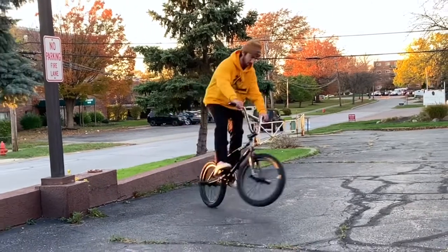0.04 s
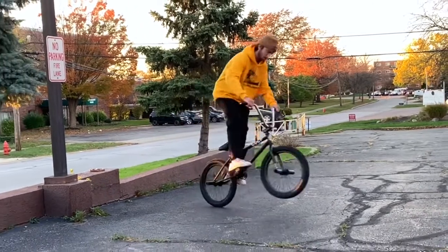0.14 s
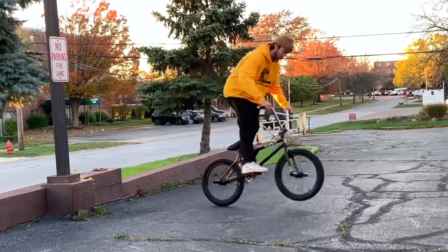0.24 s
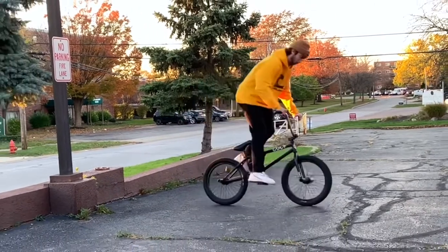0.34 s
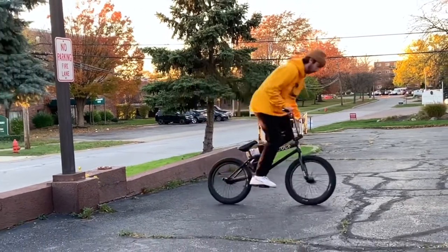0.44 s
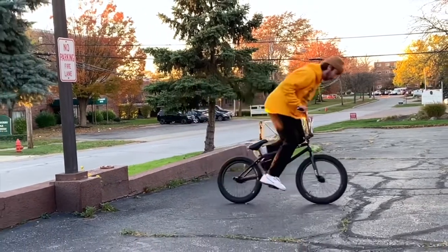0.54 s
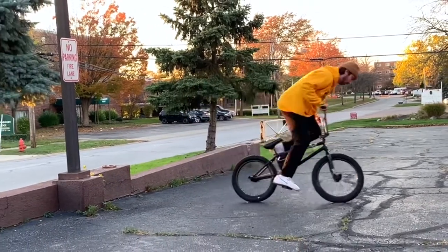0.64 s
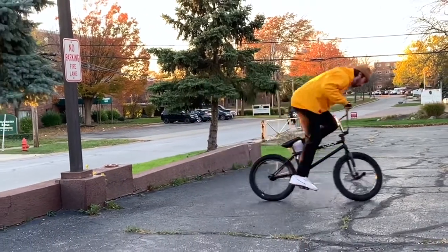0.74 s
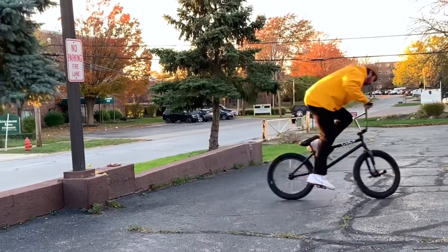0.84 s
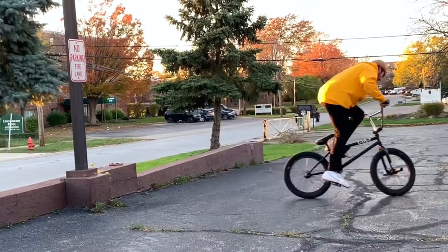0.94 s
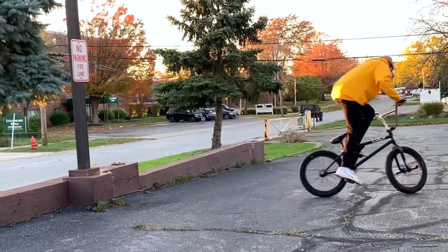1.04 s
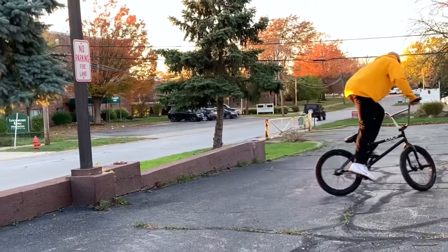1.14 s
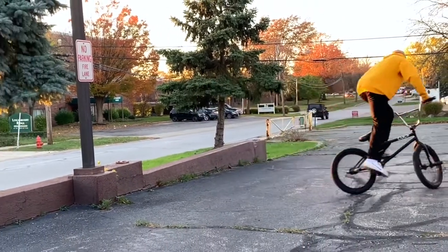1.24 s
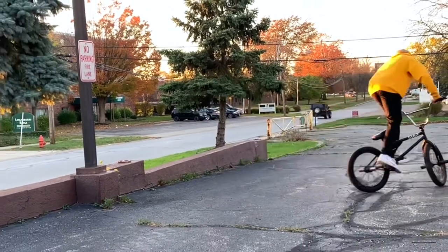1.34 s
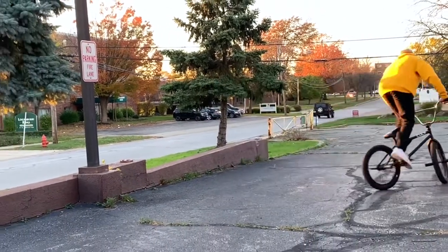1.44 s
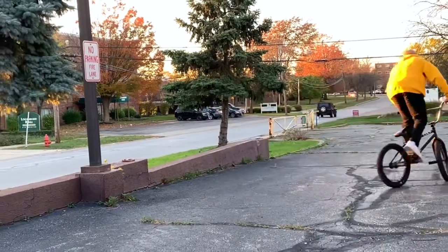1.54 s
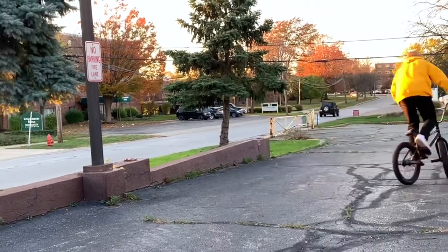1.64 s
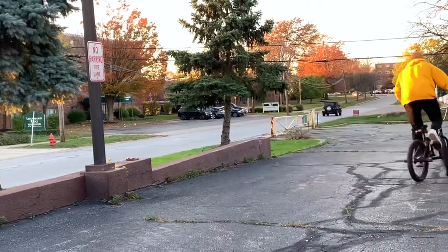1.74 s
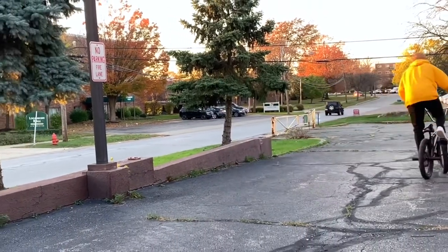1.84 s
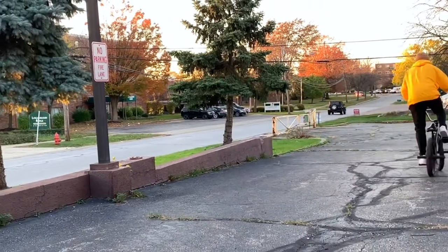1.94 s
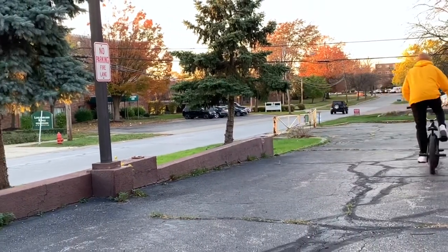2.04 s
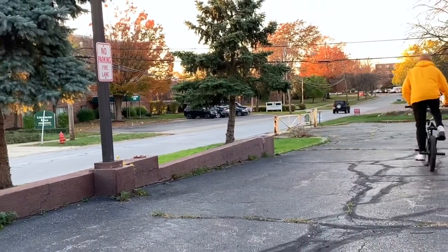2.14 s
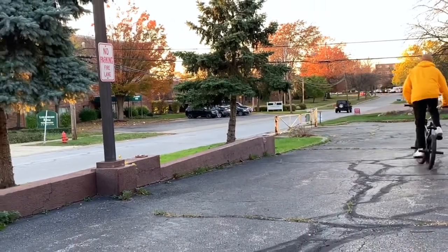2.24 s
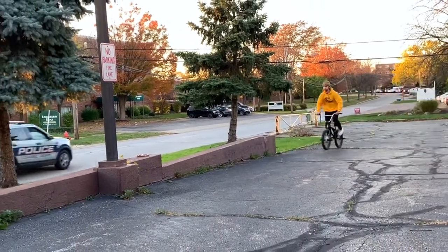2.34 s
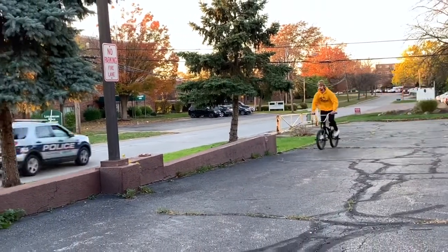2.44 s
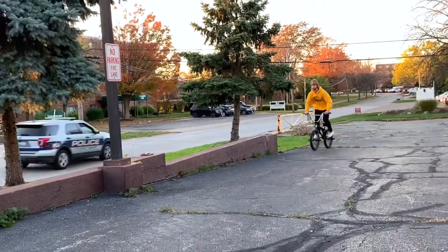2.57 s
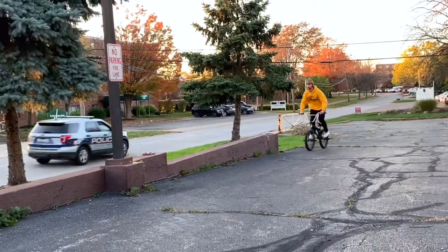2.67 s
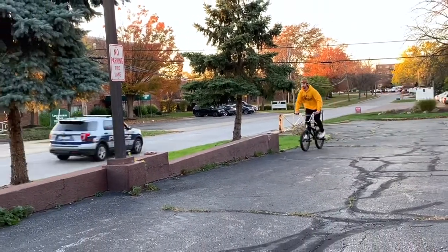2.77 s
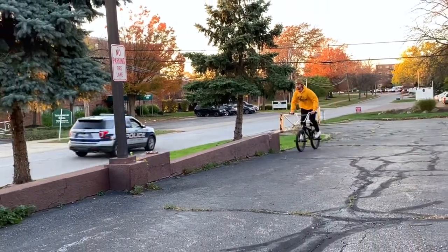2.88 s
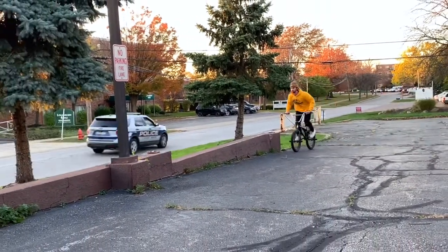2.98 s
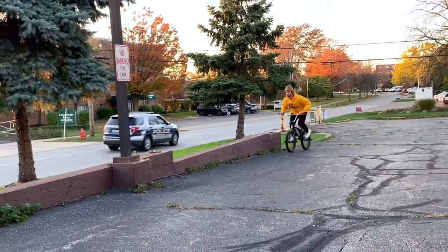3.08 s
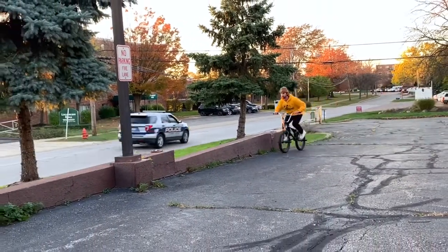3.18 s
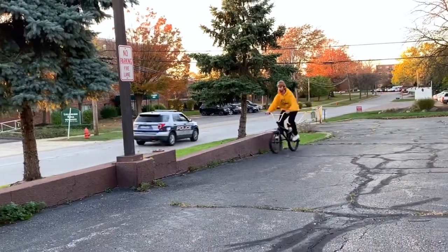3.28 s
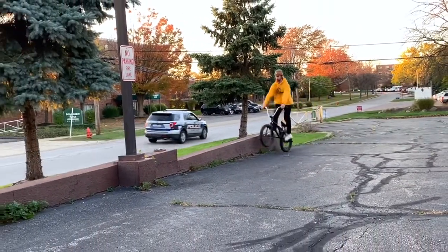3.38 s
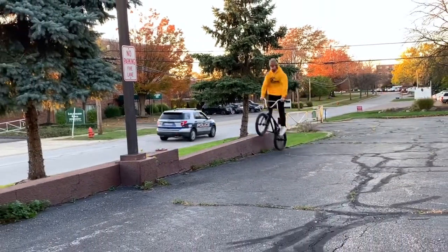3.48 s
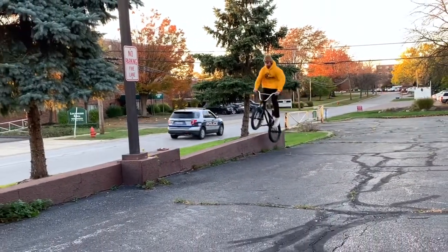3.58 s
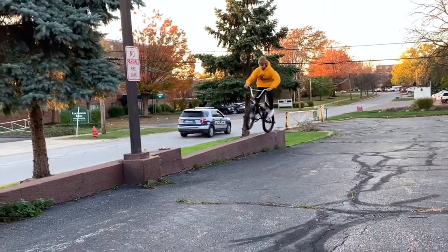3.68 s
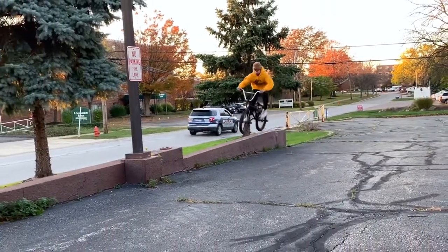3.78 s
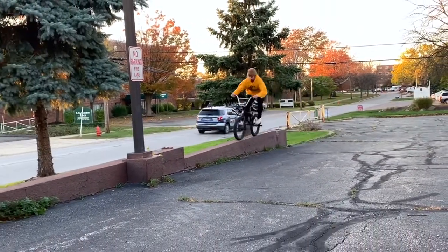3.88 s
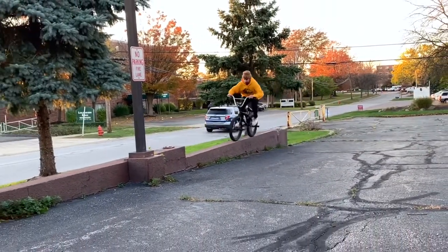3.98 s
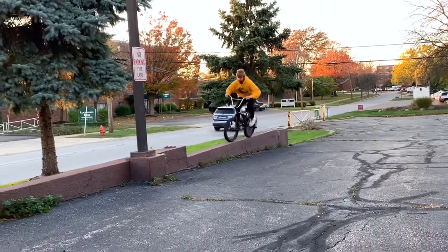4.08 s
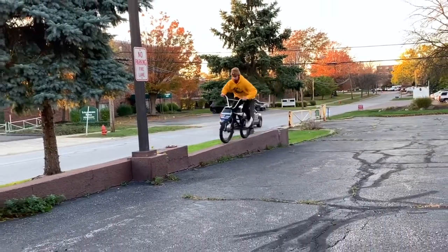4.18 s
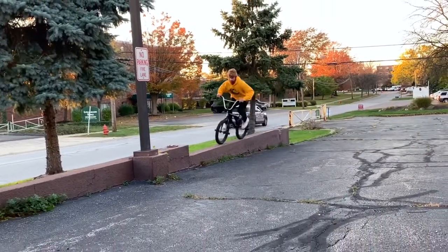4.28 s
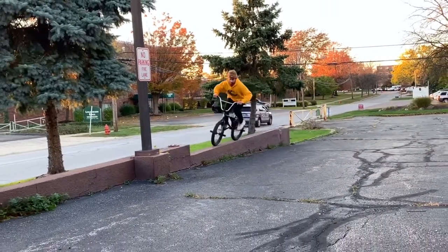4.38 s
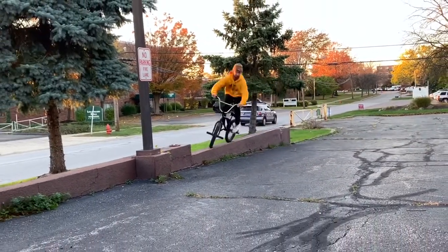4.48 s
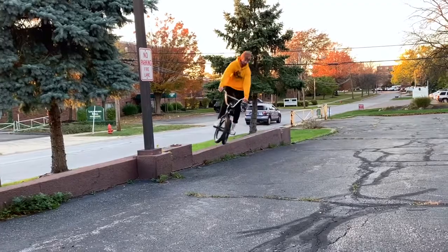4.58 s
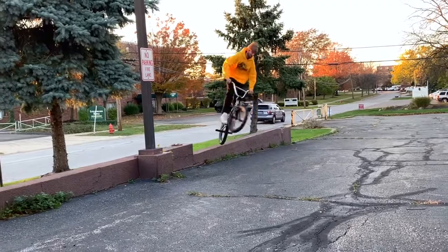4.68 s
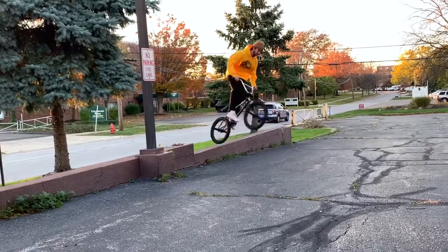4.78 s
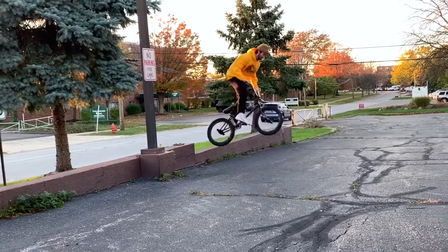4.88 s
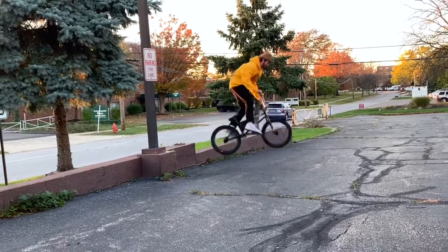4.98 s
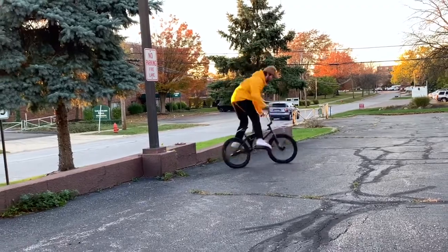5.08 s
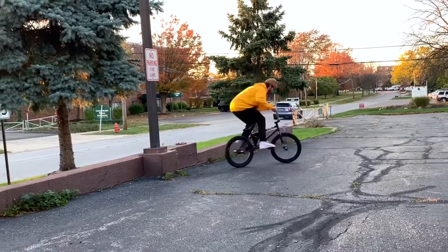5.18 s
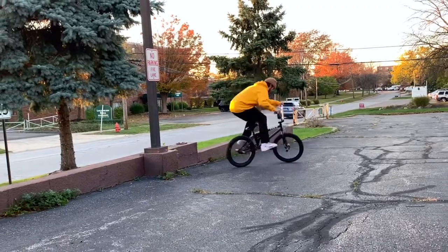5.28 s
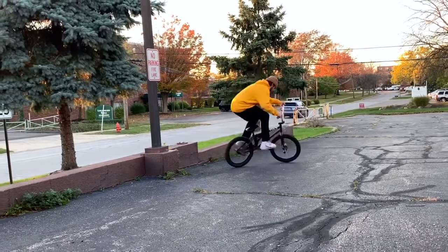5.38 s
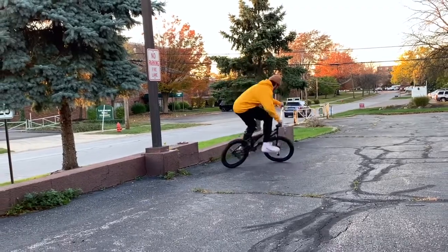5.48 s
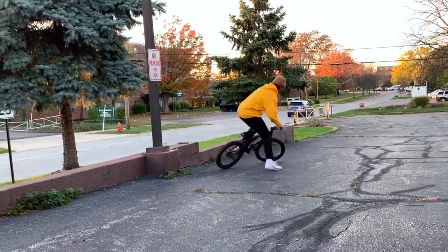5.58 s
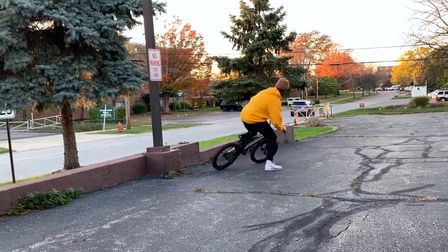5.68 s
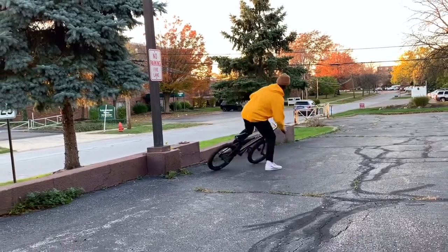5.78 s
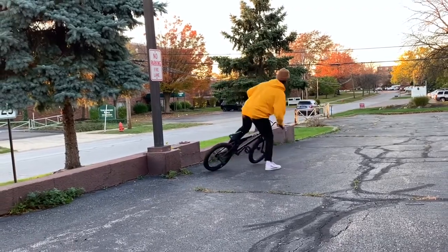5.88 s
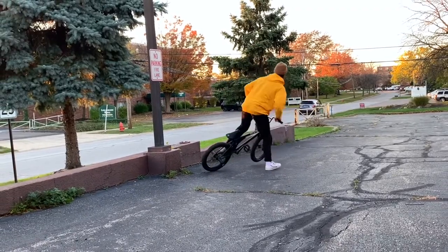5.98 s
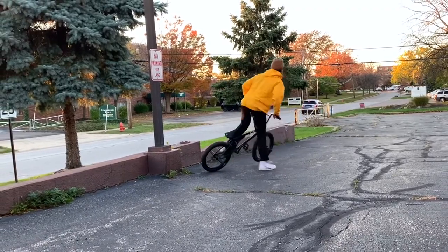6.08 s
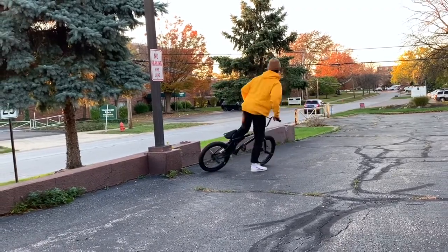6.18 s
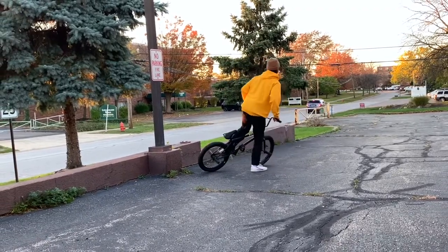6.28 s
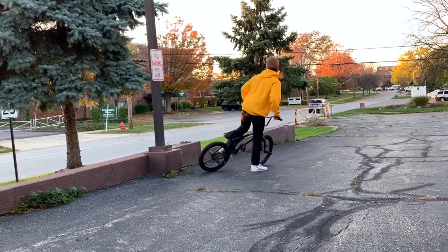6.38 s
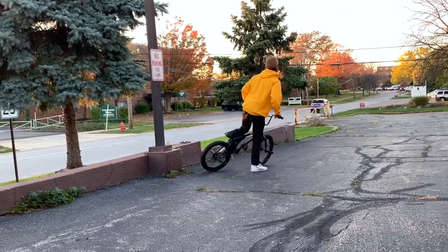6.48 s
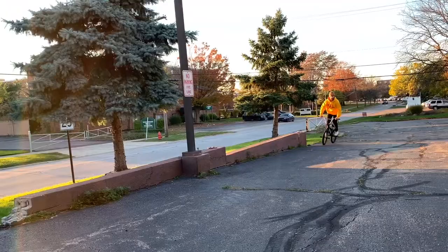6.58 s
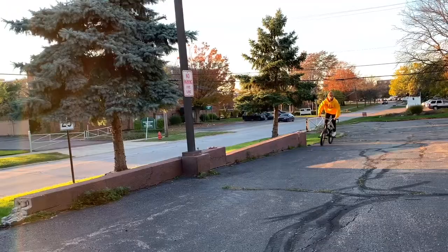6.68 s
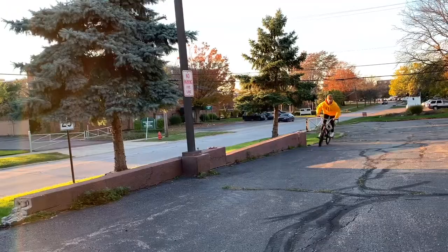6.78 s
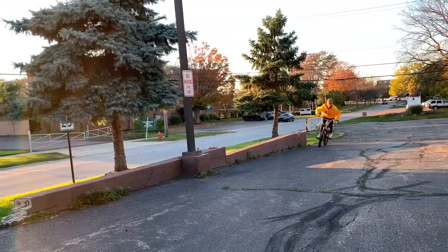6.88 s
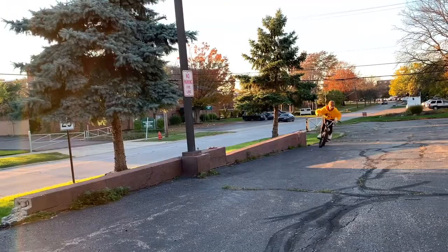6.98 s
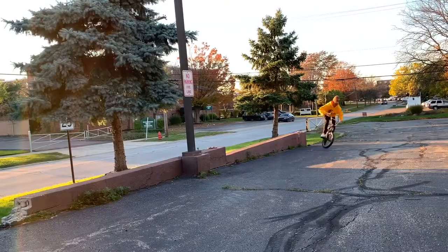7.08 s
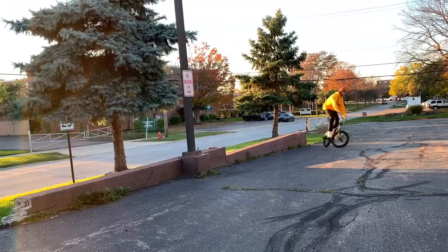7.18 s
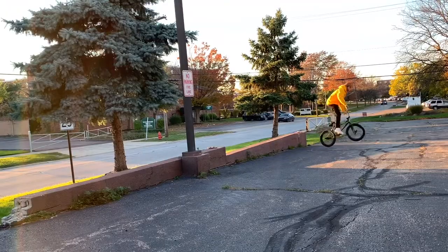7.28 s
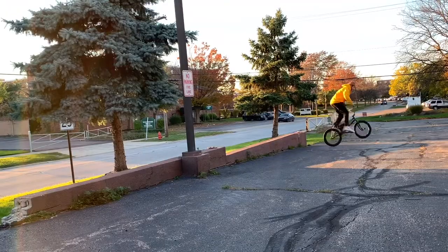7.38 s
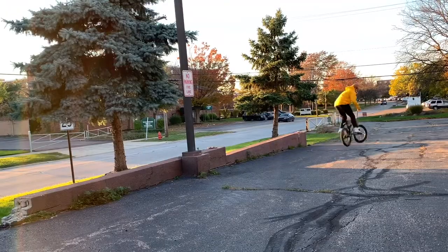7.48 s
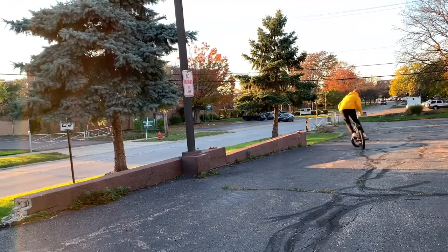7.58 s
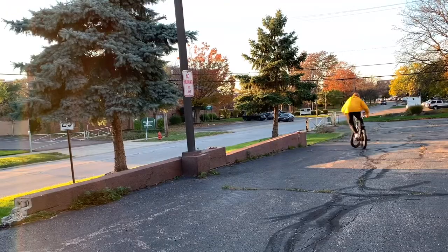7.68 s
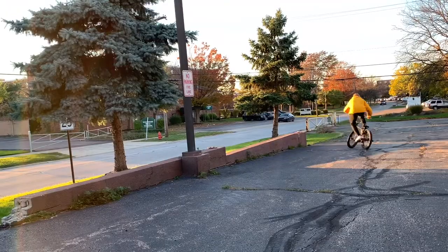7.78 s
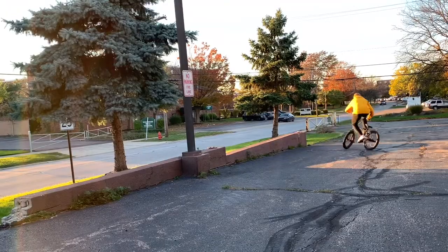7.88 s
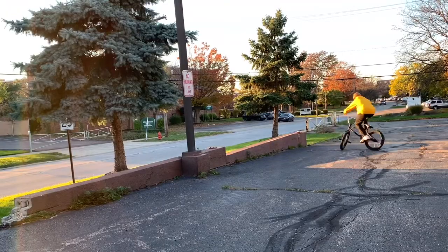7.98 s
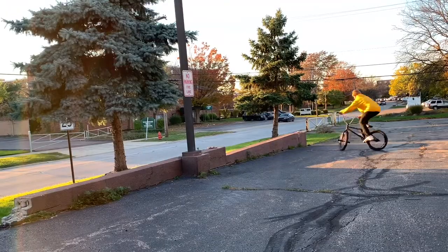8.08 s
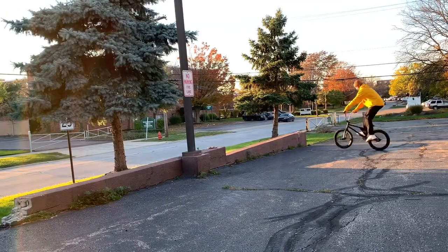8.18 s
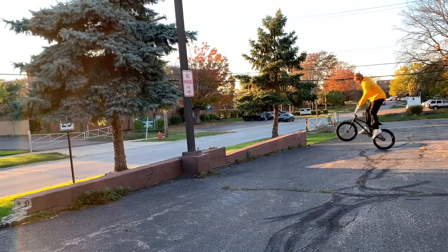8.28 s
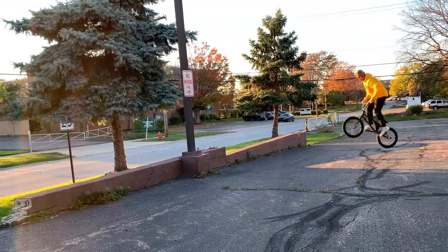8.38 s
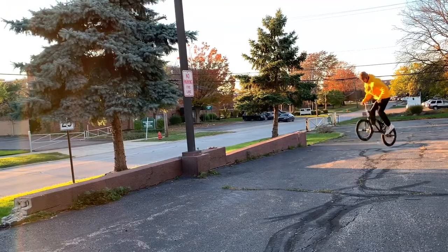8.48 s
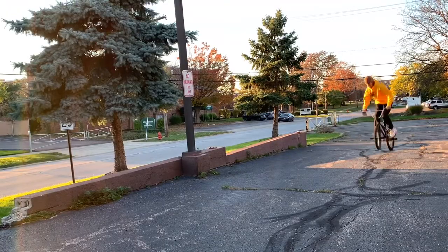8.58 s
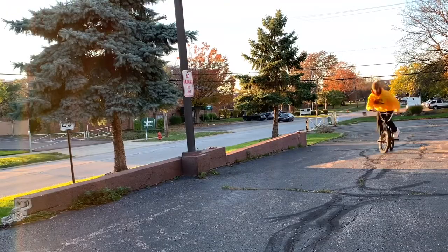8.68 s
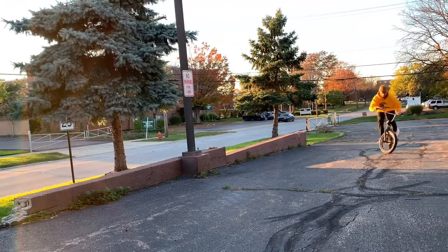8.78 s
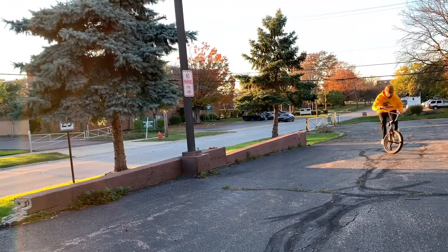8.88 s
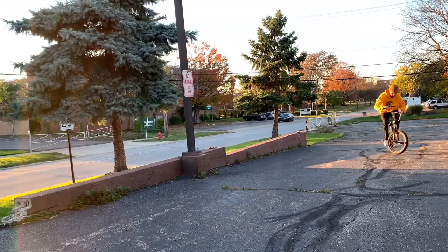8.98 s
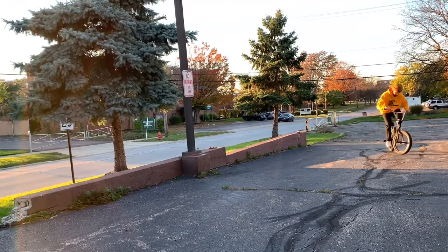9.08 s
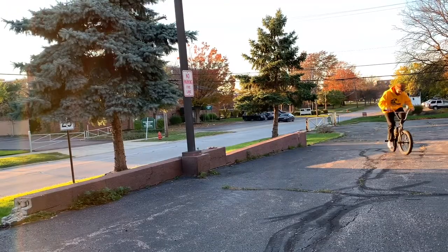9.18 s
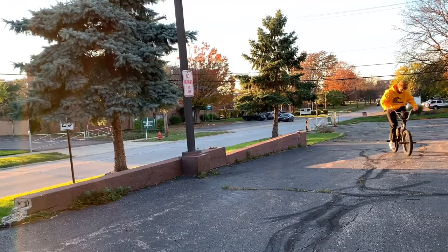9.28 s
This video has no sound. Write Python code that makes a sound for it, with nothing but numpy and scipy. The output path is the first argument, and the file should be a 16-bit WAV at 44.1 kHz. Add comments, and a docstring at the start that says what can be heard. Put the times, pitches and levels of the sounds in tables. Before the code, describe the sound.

Outdoor car park beside a road, picked up in wide stereo with almost no reverberation. Low traffic rumble and passing tyre hiss continue under sparse bicycle impacts: dull tyre knocks, bright frame clacks, chain ticks, gritty rubber scrubs. The heaviest cluster falls in the middle; the end has softer, more distant hops over a rougher, heavier engine.

```python
"""A BMX bike lands hard right away, then hops on about an asphalt car park, in three stretches joined by cuts.
Each landing knocks the tyres, clacks the frame and ticks the chain: bursts of noise, coloured and ringing.
Then the rubber scrubs over grit (random grains under a swelling load) and at times squawks.
Behind it, street traffic rumbles, drones, roars and hisses (coloured noise), and three engines hum (sines)."""
import sys
import numpy as np
from scipy import signal
from scipy.fft import rfft, irfft
from scipy.io import wavfile
from scipy.ndimage import uniform_filter1d

SR = 44100
rng = np.random.default_rng(int(sys.argv[2]) if len(sys.argv) > 2 else 0)


def bounce(signal):
    """Save signal as a 16-bit WAV file at the path given by the first command-line argument."""
    frames = np.transpose(np.atleast_2d(signal))
    limited = np.clip(frames, -1, 1)
    pcm = np.round(limited * 32767).astype(np.int16)
    wavfile.write(sys.argv[1], SR, pcm)


N = 411453
TIME = np.arange(N) / SR
BLOW_TIME = TIME[:SR // 3]
FIRST_CUT_S, SECOND_CUT_S = 2.232, 6.517

# A wheel or pedal comes down. Part levels are ahead of the mix. Columns: t/s, tyre thud/dB, frame clack/dB,
# chain tick/dB, t60/s, two f/Hz where the frame is struck hardest, first crack over the rattle/dB,
# rebound after/s, rebound level/dB, rubber rasp/dB, grit/dB
LANDINGS = [ (.015, -37, -19.5, -37, 0.029, 3830, 1280, 25, 0.0094, -4.5, -41, -56),
            (0.1832, -56, -36.5, -34.5, 0.049, 4900, 3200, 8, 0.011, -8, -45.5, -43.5),
            (1.640, -39, -30, -47, 0.032, 2350, 3200, 8, .016, -5, -52, -56.5),
            (3.7135, -25.5, -33, -43.5, 0.024, 4530, 3440, 8, 0.0077, 4, -50, -47.5),
            (4.929, -17.5, -22, -32, 0.03, 4400, 3620, 20, 0.0075, 0, -44, -39.5),
            (5.427, -18.5, -27.5, -31, .02, 3280, 4800, 11, 0.0046, 1.5, -55, -60),
            (5.462, -18, -24.5, -41, 0.019, 2290, 4800, 14, 0.0043, -8, -68, -65),
            (5.958, -27, -33, -54, .022, 900, 1050, 4, .004, -6, -48, -48),
            (7.431, -31, -24.5, -41, .042, 930, 1050, 3, .015, -11, -46, -43),
            (7.878, -36, -56, -72, 0.015, 915, 1300, 8, .014, -4, -68, -77),
            (8.481, -30, -40, -47, 0.023, 1106, 1310, 9.8, 0.0057, -7.5, -52.5, -48),
            (8.517, -31.5, -32, -33.5, 0.034, 1310, 2000, 17.5, .015, -4, -52, -49)]
# Rough heavy engine on the street: t/s, firing rate f/Hz (before its waver), level/dB (before its throb)
HEAVY_ENGINE = [(6.5, 98.6, -16.5), (6.8, 87.75, -15.5), (7.05, 95.83, -24), (7.3, 94.75, -17.5),
                (7.7, 98.03, -25.5), (8.4, 111.9, -30), (9.33, 116, -23.5)]


def undb(db):
    """Decibels to gain."""
    return 10 ** (np.asarray(db) / 20)


def unit(x):
    """Scale to an rms of one."""
    return x / np.sqrt(np.mean(x ** 2))


def curves(rows):
    """Each column of a time table, drawn out sample by sample."""
    s, *columns = np.transpose(rows)
    return [np.interp(TIME, s, column) for column in columns]


def gains(points, size):
    """Gain of a (f/Hz, level/dB) outline at each bin of a transform, straight in log frequency."""
    hz, db = np.transpose(points)
    bins = np.maximum(np.fft.rfftfreq(size, 1 / SR), 1)
    return undb(np.interp(np.log(bins), np.log(hz), db))


def colour(x, points, size=2 ** 19):
    """Causal minimum-phase filter with the given outline; white noise keeps its power."""
    gain = unit(gains(points + [(SR / 2, points[-1][1] - 20)], size))
    # folding the cepstrum forward in time makes the filter causal
    cepstrum = irfft(np.log(gain))
    cepstrum[1:size // 2] *= 2
    cepstrum[size // 2 + 1:] = 0
    return irfft(rfft(x, size) * np.exp(rfft(cepstrum)))[..., :N]


def band_unit(x, band):
    """Scale so that the middle channel has an rms of one inside a band (Hz)."""
    band_filter = signal.butter(4, band, "band", fs=SR, output="sos")
    return x / np.std(signal.sosfilt(band_filter, x[0]))


def walk(rate):
    """Slow random curve with an rms of one, heading for a new value rate times a second."""
    hold = int(SR / rate)
    steps = np.repeat(rng.standard_normal(N // hold + 1), hold)
    return unit(uniform_filter1d(steps, hold)[:N])


def noise():
    """Unrelated white noise in two channels."""
    return rng.standard_normal((2, N))


def add(track, s, sound):
    """Mix a sound into a track at a time."""
    i = max(int(s * SR), 0)
    track[..., i:i + sound.shape[-1]] += sound[..., :N - i]


def echo(x, lag, gain):
    """Add a reflection that comes lag seconds late; the lag may move."""
    return x + gain * np.array([np.interp(TIME - lag, TIME, channel, left=0) for channel in x])


def knocks():
    """Every landing is an impact and a rebound; loose parts also knock as the bike settles."""
    # t/s, frame clack/dB, f/Hz where the frame is struck hardest
    rattles = [(.033, -27.5, 3000), (.062, -40, 2800), (.244, -41, 3200), (4.956, -27, 2300),
               (4.998, -38, 4000), (5.026, -44, 2700), (5.049, -44, 4000), (5.080, -37, 4200),
               (5.448, -34, 2300), (5.454, -39, 1900), (5.483, -38, 1950), (5.489, -43, 2700),
               (5.645, -42.5, 1300), (7.455, -39, 2760), (7.465, -37, 1100), (8.545, -44, 2300)]
    rebound_stretch, rebound_crack_db = 1.24, 0.5  # the rebound rattles longer and cracks harder
    rattle_t60_s, rattle_crack_db = 0.041, 10.5
    rattle_parts_db = np.array([-6, 0, -17])  # tyre, frame and chain, against the frame
    # yields t/s, levels of tyre, frame and chain/dB, t60/s, crack/dB, f/Hz where struck
    for s, thud, clack, tick, t60, *struck_hz, crack_db, rebound_s, rebound_db, _, _ in LANDINGS:
        part_db = np.array([thud, clack, tick])
        yield s, part_db, t60, crack_db, struck_hz
        yield (s + rebound_s, part_db + rebound_db, t60 * rebound_stretch,
               crack_db + rebound_crack_db, struck_hz)
    for s, db, hz in rattles:
        yield s, db + rattle_parts_db, rattle_t60_s, rattle_crack_db, [hz]


def clatter(t60, crack_db=6.5):
    """A crack, then rattling that dies away; the harder the crack, the less is left to rattle."""
    dying = undb(-60 * BLOW_TIME / t60)
    burst = rng.standard_normal((2, len(BLOW_TIME))) * dying
    burst[0, 0] += undb(crack_db)
    return burst / np.hypot(1, undb(crack_db) / np.linalg.norm(dying))


def blow_forces(tick_t60_s=0.034):
    """Contact forces on tyres, frame and chain: a clatter at each knock, and the chain slapping on its own."""
    # lone chain slaps: t/s, level/dB
    chain_slaps = [(0.243, -40), (0.734, -52), (1.249, -55), (2.138, -54), (5.027, -35), (5.080, -35.5),
                   (5.174, -42), (5.552, -57), (5.645, -64), (6.066, -35.5), (7.575, -52), (7.759, -49),
                   (8.938, -56)]
    force = np.zeros((3, 2, N))
    for s, part_db, t60, crack_db, _ in knocks():
        for part, db in zip(force, part_db):
            add(part, s, undb(db) * clatter(t60, crack_db))
    for s, db in chain_slaps:
        add(force[2], s, undb(db) * clatter(tick_t60_s))
    return force


def tyre_knock(force, thud_db=-2.5, boom_db=-8):
    """The tyre thuds dully, and the air inside it booms briefly as a few damped modes."""
    # colour of the thud: f/Hz, level/dB
    thud_colour = [(50, -24), (130, -9.5), (300, 2), (430, -2.5), (560, -1), (700, -3.5), (860, -4),
                   (1150, -17.5), (2500, -43.5)]
    # air modes: f/Hz, level/dB, t60/s
    air_modes = [(328, -1.5, 0.13), (545, -2, 0.057), (816, 1.5, 0.036)]
    t = BLOW_TIME
    air = sum(undb(db - 60 * t / t60) * np.sin(2 * np.pi * hz * t) for hz, db, t60 in air_modes)
    boom = signal.oaconvolve(force, air[None] / np.linalg.norm(air), axes=1)[:, :N]
    return undb(thud_db) * colour(force, thud_colour) + undb(boom_db) * boom


def frame_clack(force, clack_db=-2):
    """The frame answers the contact with a short broad clack."""
    # f/Hz, level/dB
    clack_colour = [(500, -29), (1000, 15), (1500, 8.5), (1900, 9), (2400, 3), (4300, -0.5), (5200, -3.5),
                    (6200, -18), (9000, -44)]
    return undb(clack_db) * colour(force, clack_colour)


def frame_ring(ring_db=-2.5, focus_db=10, focus_octaves=0.22, detune=0.018):
    """Tubes, rims and spokes ring as damped modes; the place of contact decides which speak most."""
    # modes before detuning: f/Hz, level/dB (before the focus), t60/s
    frame_modes = [(915, -0.5, 0.033), (1050, -4, 0.022), (1226, -26.5, .5), (1310, -3, 0.042),
                   (1910, -29, .4), (2150, -1.5, 0.011), (2346, 1.5, 0.012), (2760, -8.5, 0.011),
                   (3200, -2, 0.013), (3440, -1.5, 0.012), (3560, -27, 0.22), (3870, 1.5, 0.016),
                   (4530, -2, 0.021), (4800, -7.5, .012), (7300, -8, .008)]
    ring = np.zeros((2, N))
    mode_hz, mode_db, mode_t60 = np.transpose(frame_modes)
    fading = undb(mode_db[:, None] - 60 * BLOW_TIME / mode_t60[:, None])
    for s, part_db, t60, crack_db, struck_hz in knocks():
        # load and grip shift the modes a little
        shifted_hz = mode_hz * (1 + detune * rng.standard_normal(len(mode_hz)))
        octaves_off = np.log2(mode_hz[:, None] / struck_hz)
        weight = undb(focus_db * np.exp(-(octaves_off / focus_octaves) ** 2).max(axis=1))
        body = weight @ (fading * np.sin(2 * np.pi * shifted_hz[:, None] * BLOW_TIME))
        rung = signal.fftconvolve(clatter(t60), body[None] / np.linalg.norm(body))
        add(ring, s, undb(part_db[1]) * rung)
    return undb(ring_db) * ring


def chain_tick(force):
    """The chain answers with a bright metallic tick."""
    # f/Hz, level/dB
    tick_colour = [(2500, -28), (4800, 3), (7500, 9.5), (10300, 10), (11900, 2), (13800, 5.5),
                   (15500, -8.5)]
    return colour(force, tick_colour)


def blows():
    """Each blow drives tyres, frame and chain together."""
    on_tyre, on_frame, on_chain = blow_forces()
    return tyre_knock(on_tyre) + frame_clack(on_frame) + frame_ring() + chain_tick(on_chain)


def slides(scrub_after_s=0.027, scrub_rise_s=0.024, scrub_t60_s=0.38):
    """The squashed tyre scrubs after every landing; tyre or shoe also skids in a turn or a stop."""
    # t/s of the peak, rise/s, rasp/dB, grit/dB
    skids = [(.14, 0.12, -59, -52), (1.63, 0.042, -62, -55.5), (2.14, 0.056, -55, -68),
             (5.105, 0.018, -69, -50.5), (5.293, 0.0056, -42, -38.5), (5.37, 0.11, -63, -55),
             (5.78, 0.1, -50.5, -53), (5.807, 0.0033, -43, -45.5), (5.886, 0.019, -44, -42.5),
             (5.908, 0.0034, -44, -43), (5.945, 0.02, -57, -46), (5.982, .0085, -34.5, -34),
             (6.004, 0.0074, -37.5, -39), (7.0, 0.15, -59, -65.5), (7.560, 0.009, -49, -44),
             (7.77, 0.035, -53.5, -51.5), (7.83, 0.028, -58, -55), (8.02, 0.034, -50, -51.5),
             (8.575, .01, -59, -50), (8.63, 0.03, -59, -58), (9.24, 0.048, -61.5, -75)]
    release_s, release_per_rise = 0.067, 2.9  # the slower a skid builds, the slower it lets go
    # yields t/s of the peak, rise/s, t60/s, rasp/dB, grit/dB
    for s, *_, rasp_db, grit_db in LANDINGS:
        yield s + scrub_after_s, scrub_rise_s, scrub_t60_s, rasp_db, grit_db
    for s, rise, rasp_db, grit_db in skids:
        yield s, rise, release_s + release_per_rise * rise, rasp_db, grit_db


def slide_loads(roll_on_db=-13, roll_on_t60_s=0.41, release_power=1.34):
    """Pressure builds, holds on and lets go firmly; then the tyre rolls on over the grit."""
    rasp_power, grit_power = np.zeros(N), np.zeros(N)
    for s, rise, t60, rasp_db, grit_db in slides():
        near = slice(max(int((s - 3 * rise) * SR), 0), int((s + roll_on_t60_s) * SR))
        t = TIME[near] - s
        release_db = -60 * (np.abs(t) / t60) ** release_power
        roll_db = roll_on_db - 60 * np.abs(t) / roll_on_t60_s
        load = np.where(t < 0, np.exp(-(t / rise) ** 2), undb(np.maximum(release_db, roll_db)))
        rasp_power[near] += (load * undb(rasp_db)) ** 2
        grit_power[near] += (load * undb(grit_db)) ** 2
    return np.sqrt(rasp_power), np.sqrt(grit_power)


def grains(rate, spread_db):
    """Tiny stones snapping at random, rate times a second, a few much louder than the rest."""
    size = undb(spread_db * np.minimum(rng.exponential(size=N), 5))
    return unit(noise() * size * (rng.random(N) < rate / SR))


def scrubs(grit_db=-2.5, slip_db=1.5, scuff_db=2.0):
    """Under a sliding load the rubber rasps and the grit crackles, both as streams of grains."""
    # f/Hz, level/dB
    rasp_colour = [(400, -8), (850, -2), (1150, 0.5), (1700, 5), (2050, 1.5), (2550, 0.5), (3150, 2),
                   (3800, -5.5), (4600, -5.5), (7000, -19), (12000, -31)]
    grit_colour = [(2000, 0.5), (4500, 6), (7500, 4.5), (10500, 6), (11900, -1.5), (13800, 4.5),
                   (15500, -11)]
    rasp_load, grit_load = slide_loads()
    # the tread catches and slips, so the grains come in clumps
    rasp = grains(rate=3600, spread_db=2.1) * rasp_load * undb(slip_db * walk(160))
    grit = grains(rate=6000, spread_db=1.5) * grit_load * undb(slip_db * walk(120))
    rubber, stones = colour(rasp, rasp_colour), colour(grit, grit_colour)
    # slower unevenness gathers the grains into longer scuffs
    return (rubber + undb(grit_db) * stones) * undb(scuff_db * walk(45))


def squawks(rate=900, side_db=-3):
    """Gripping rubber sticks and slips fast: a rough, narrow resonance, some gliding up or down."""
    # t/s, f/Hz, glide/(Hz/s), level/dB, half width/s
    squawk_rows = [(.03, 3950, -1, -39, 0.014), (.052, 4840, 6003, -44, 0.014), (.1, 3570, 0, -53, .025),
                   (5.987, 2127, 38000, -40, 0.032), (6.011, 2865, -8000, -36.5, 0.024),
                   (7.448, 2860, -1, -33, 0.0024)]
    out = np.zeros((2, N))
    middle = walk(rate) + 1j * walk(rate)
    judder = np.array([middle, undb(side_db) * (walk(rate) + 1j * walk(rate))])
    for s, hz, glide, db, width in squawk_rows:
        near = slice(max(int((s - 3 * width) * SR), 0), int((s + 3 * width) * SR))
        t = TIME[near] - s
        tone = np.real(judder[:, near] * np.exp(2j * np.pi * (hz + glide * t / 2) * t))
        out[:, near] += undb(db) * np.exp(-(t / width) ** 2) * tone
    return out


def car_park(x, wet_db=-18, t60=0.084):
    """The asphalt mirrors the moving bike; the low wall and the trees scatter a weak, short tail."""
    x = echo(x, lag=0.001298 + 0.00032 * walk(2.2), gain=0.26)
    t = TIME[:SR // 2]
    tail = rng.standard_normal((2, len(t))) * undb(-60 * t / t60) * (t > .008)
    scattered = signal.fftconvolve(x, tail / np.linalg.norm(tail[0]), axes=1)[:, :N]
    return x + undb(wet_db) * scattered


def ports(x, level_db=1.3, size=2 ** 19):
    """A near sound from ahead reaches both microphone ports alike but out of step, by an angle set by frequency."""
    # f/Hz, angle by which the left leads/rad
    port_phase = [(400, 0), (900, 2), (1500, 1.97), (2300, 0.1), (2900, 1.83), (3700, 0.5), (5200, 2),
                  (6600, -1.5), (8650, 3.5), (15250, 17)]
    # gain of the part that reaches the ports unrelated: f/Hz, level/dB
    scatter = [(100, -12.5), (500, -3.5), (2000, -6.5), (7000, -2.5), (10000, -12)]
    direct, scattered = rfft(x, size)
    scattered = scattered * gains(scatter, size)
    turn = np.exp(.5j * np.interp(np.fft.rfftfreq(size, 1 / SR), *np.transpose(port_phase)))
    left, right = (direct + scattered) * turn, (direct - scattered) / turn
    return undb(level_db) * irfft(np.array([left, right]))[:, :N]


def chirps():
    """Dry metal chirps: brief high tones with a roughened phase."""
    # t/s, f/Hz, level/dB, width/s (20 dB down at two widths from the peak)
    chirp_rows = [(6.120, 13800, -46, 0.0062), (8.313, 12200, -52.5, 0.0026)]
    out = np.zeros(N)
    for s, hz, db, width in chirp_rows:
        fall_db = 20 * np.minimum(((TIME - s) / (2 * width)) ** 2, 20)
        out += undb(db - fall_db) * np.sin(2 * np.pi * hz * TIME + walk(970))
    return out


def sizzle(level_db=-56, fall_db=9.0):
    """The highest tyre hiss carries only in the middle stretch, fading by some dB each second."""
    # f/Hz, level/dB
    sizzle_colour = [(3000, -29), (6500, 11), (8600, 5), (10300, 0.5), (11800, -12.5), (13500, -6),
                     (15500, -23)]
    close = (TIME > FIRST_CUT_S) & (TIME < SECOND_CUT_S)
    fading = undb(level_db - fall_db * np.abs(TIME - FIRST_CUT_S) + walk(6))
    return colour(noise(), sizzle_colour) * fading * close


def engine(rows, waver, throb_db, octave_db, follow):
    """A note that wavers and throbs; its octave is at octave_db at full effort and partly follows the level."""
    hz, level_db = curves(rows)
    order_db = level_db, octave_db + follow * (level_db - level_db.max())
    phase = 2 * np.pi * np.cumsum(hz * (1 + waver * walk(25))) / SR
    running = uniform_filter1d(1. * ((TIME >= rows[0][0]) & (TIME <= rows[-1][0])), SR // 30)
    return running * sum(undb(db + throb_db * walk(19)) * np.sin(k * phase)
                         for k, db in enumerate(order_db, 1))


def engines():
    """One engine far off, then a car's, then a rough heavy one."""
    # t/s, firing rate f/Hz (before its waver), level/dB (before its throb)
    far_engine = [(0, 76.53, -27.5), (.5, 78.1, -23.5), (2.2, 77.32, -29)]
    car_engine = [(2.3, 102.9, -31), (3.6, 106.9, -27.5), (4.2, 108.3, -33.5), (5.4, 113.3, -25.5),
                  (6.5, 112.7, -19.5)]
    far = engine(far_engine, waver=0.011, throb_db=3.5, octave_db=-46.5, follow=.2)
    car = engine(car_engine, waver=0.0118, throb_db=2.0, octave_db=-31.5, follow=0.46)
    heavy = engine(HEAVY_ENGINE, waver=0.0535, throb_db=2.0, octave_db=-39.5, follow=0.88)
    return far + car + heavy


def stretch_at(s):
    """Number of the stretch between cuts in which a time falls."""
    return np.searchsorted([FIRST_CUT_S, SECOND_CUT_S], s)


def traffic_levels():
    """The traffic's settings in each stretch, held sample by sample."""
    # ahead of the mix: start t/s, rumble/dB, drone/dB, far tyre roar/dB, its drift/(dB/s), tyre hiss/dB
    stretches = [(0, -27, -41.5, -42, -0.8, -57.5), (2.232, -26, -37, -44, -0.81, -78),
                 (6.517, -22.5, -37, -49.5, 0, -71.5)]
    return np.array(stretches)[stretch_at(TIME)].T


def restless(x, depth_db, rate, count=8, size=2 ** 19):
    """Each band swells and fades by itself, as road surface and breeze change."""
    log_hz = np.log1p(np.fft.rfftfreq(size, 1 / SR))
    place = np.interp(log_hz, np.log([300, 8000]), [0, count - 1])
    spectrum = rfft(x, size)
    out = 0
    for k in range(count):
        band = irfft(spectrum * np.maximum(1 - np.abs(place - k), 0))[:, :N]
        out = out + band * undb(depth_db * walk(rate))
    return out


def road_tyres(roar_db=-.5, hiss_db=-2.5, flutter_db=0.9, fall_db=57):
    """Far tyres roar and hiss, and those of nearer cars swell and fade with distance as they pass."""
    # f/Hz, level/dB
    roar_colour = [(100, -7), (250, 10), (450, -5), (640, 1), (820, -1.5), (1250, -8), (2000, -13.5),
                   (3000, -26), (6000, -51.5), (15000, -51.5)]
    hiss_colour = [(100, -1), (165, 17), (260, 22.5), (340, 16.5), (450, -3), (1000, 5), (2000, 2),
                   (3000, 1.5), (4300, -1.5), (5500, -9), (7200, -14), (8500, -22), (10000, -22.5),
                   (15000, -42)]
    # cars going by: t/s when loudest, time to double the squared distance/s, roar/dB, hiss/dB (ahead of the mix)
    passes = [(1.75, 0.39, -55, -62.5), (3.3, 1.85, -49, -48), (4.75, 0.65, -46.5, -63),
              (5.65, 0.71, -45.5, -76)]
    start, _, _, far_db, drift, hiss_floor_db = traffic_levels()
    roaring, hissing = undb(far_db + drift * (TIME - start)), undb(hiss_floor_db)
    for s, span, car_roar_db, car_hiss_db in passes:
        distance = np.hypot(1, (TIME - s) / span)
        # fall_db per tenfold distance; a car is heard only within its own stretch
        near = undb(-fall_db * np.log10(distance)) * (stretch_at(TIME) == stretch_at(s))
        roaring = np.hypot(roaring, near * undb(car_roar_db))
        hissing = np.hypot(hissing, near * undb(car_hiss_db))
    roar = band_unit(colour(noise(), roar_colour), (500, 1500)) * roaring
    roar = roar * undb(roar_db + flutter_db * walk(9))
    hiss = band_unit(colour(noise(), hiss_colour), (2500, 7000)) * hissing * undb(hiss_db)
    # a bounce off the road combs the tyre noise; its lag wanders slowly
    moving = restless(roar + hiss, depth_db=1.17, rate=8, count=12)
    return echo(moving, lag=0.002256 + 0.00026 * walk(0.825), gain=0.22)


def traffic_rumble(rumble_db=0.5, steadiness=0.45, exhaust_db=-6):
    """Running engines rumble with a nearly steady power; the heavy engine's exhaust adds as it works harder."""
    # f/Hz, level/dB
    rumble_colour = [(20, -33.5), (32, -20.5), (50, -1), (70, 2), (95, -0.5), (130, -5.5), (180, -11.5),
                     (290, -18.5), (420, -27), (800, -67)]
    low_db = traffic_levels()[1]
    exhaust = undb(curves(HEAVY_ENGINE)[1] + exhaust_db) * (TIME > SECOND_CUT_S)
    rumble = colour(noise(), rumble_colour)
    # even out the slower swells
    power = uniform_filter1d(rumble[0] ** 2, SR // 10)
    rumble = unit(rumble / power ** np.clip(steadiness, 0, .5))
    return rumble * np.hypot(undb(low_db + rumble_db), exhaust)


def traffic_drone(gust_db=2.9):
    """The low drone of the traffic comes in gusts."""
    # f/Hz, level/dB
    drone_colour = [(80, -21), (170, 0.5), (290, 0.5), (400, -11.5), (560, -15.5), (800, -23.5),
                    (1500, -52)]
    drone_db = traffic_levels()[2]
    return colour(noise(), drone_colour) * undb(drone_db + gust_db * walk(8))


def scene(size=2 ** 19):
    """The traffic is narrow in the bass and wide above it; the bike and the nearest tyre hiss come from ahead."""
    # f/Hz, side minus mid/dB
    side_width = [(60, -23), (110, -11.5), (200, -6.5), (380, -0.5), (700, 3.5), (1290, 3.5), (2380, -2),
                  (4400, -0.5), (8120, -0.5), (15000, -1.5)]
    # f/Hz, left minus right/dB
    left_lean = [(100, -3.5), (250, -2.5), (500, 1.5), (1500, 1), (4000, -0.5), (12000, -0.5)]
    bike = car_park(blows() + scrubs() + squawks())
    ahead = ports(bike + sizzle())
    mid, side = road_tyres() + traffic_rumble() + traffic_drone()
    mid = mid + engines() + chirps()
    mid, side = rfft(mid, size), rfft(side, size) * gains(side_width, size)
    lean = np.sqrt(gains(left_lean, size))
    street = irfft(np.array([(mid + side) * lean, (mid - side) / lean]))[:, :N]
    return street + ahead


def record(dry, dip_db=-18, dip_width=0.014, click_db=-22, top_hz=15700):
    """The level dips briefly at the first cut, the second cut clicks, and the top is cut off."""
    out = dry * undb(dip_db * np.exp(-((TIME - FIRST_CUT_S) / dip_width) ** 2))
    add(out, SECOND_CUT_S, undb(click_db) * np.exp(-TIME[:SR // 100] / .0001))
    return signal.sosfilt(signal.ellip(8, .2, 70, top_hz, fs=SR, output="sos"), out)


dry = scene()
out = record(dry)
bounce(out)
```